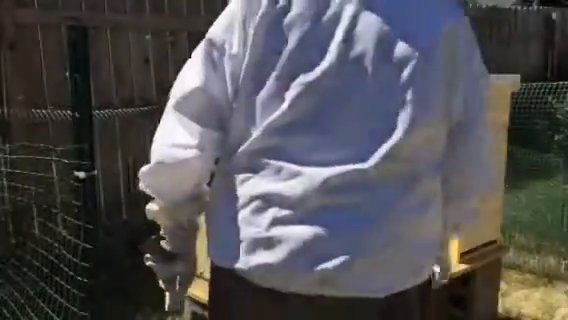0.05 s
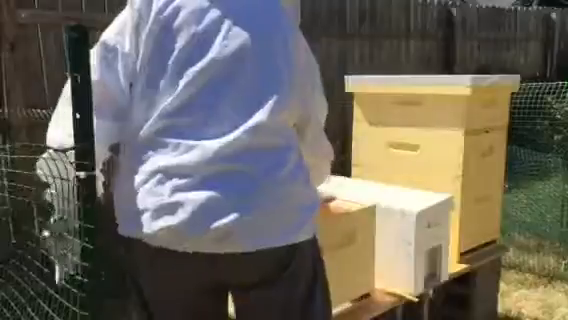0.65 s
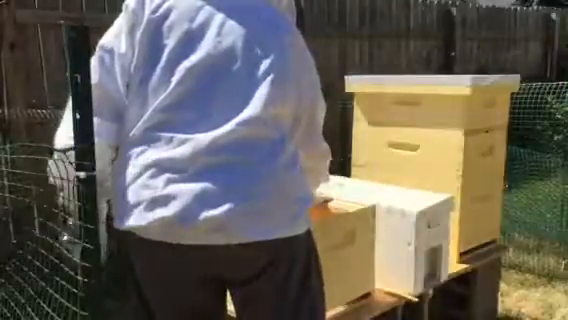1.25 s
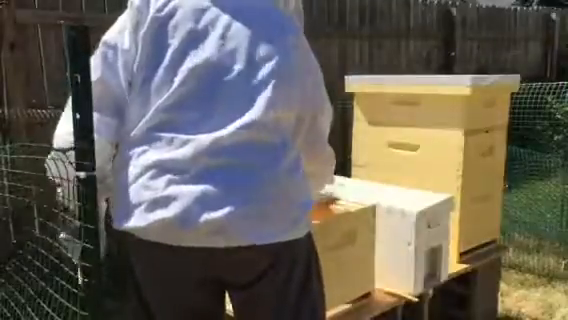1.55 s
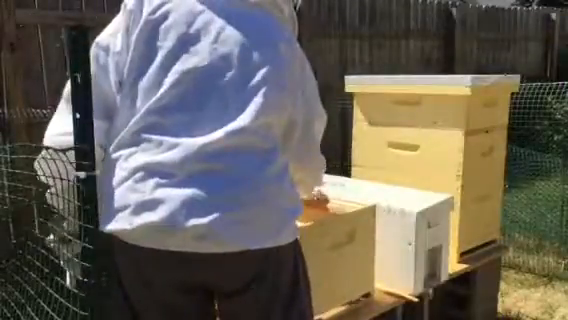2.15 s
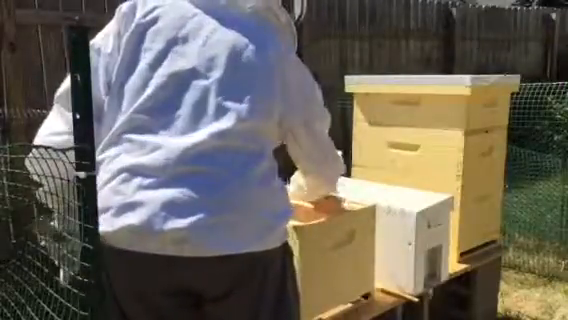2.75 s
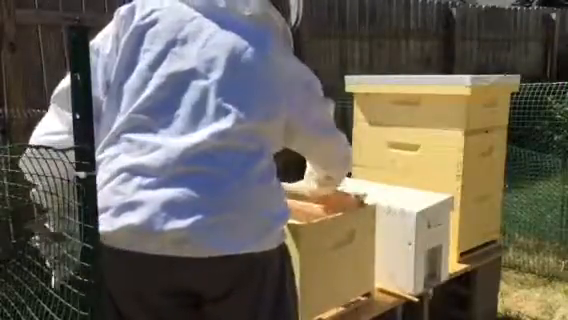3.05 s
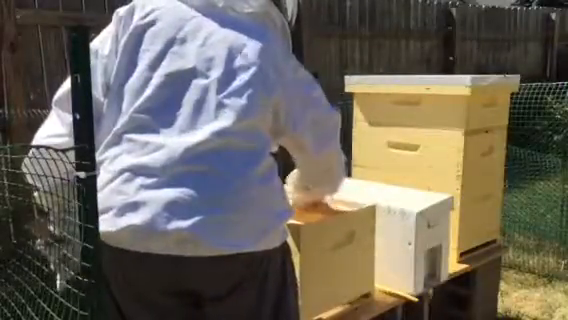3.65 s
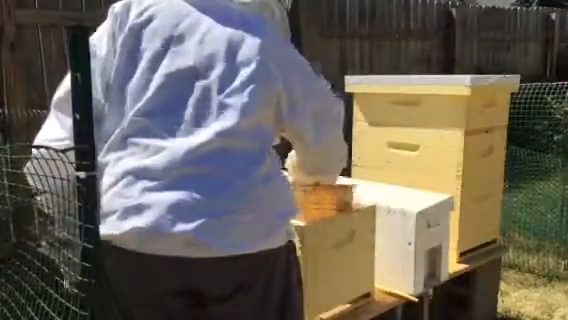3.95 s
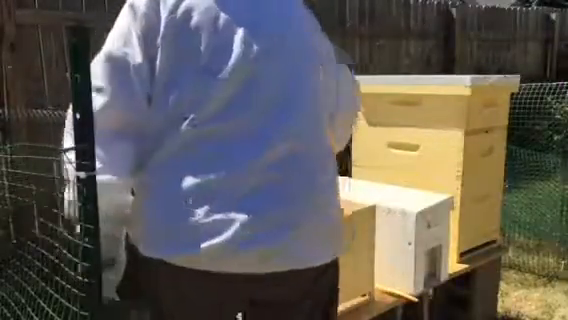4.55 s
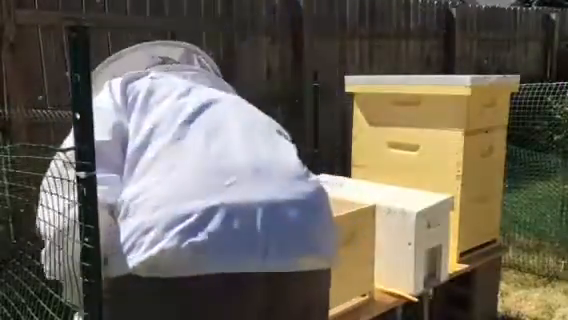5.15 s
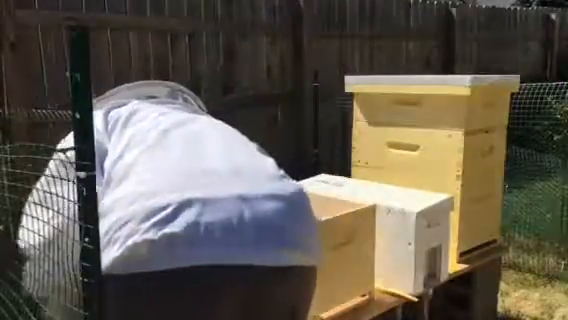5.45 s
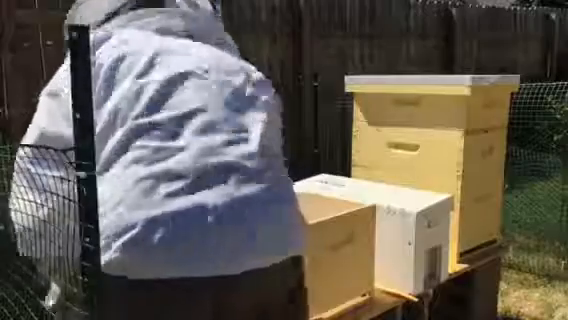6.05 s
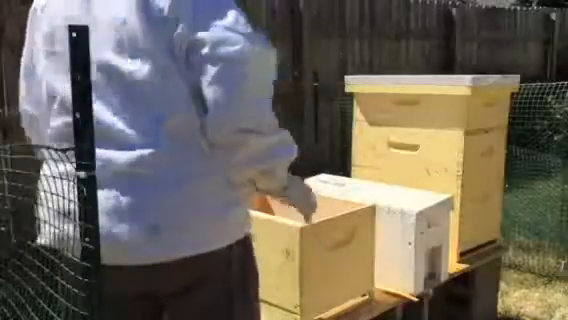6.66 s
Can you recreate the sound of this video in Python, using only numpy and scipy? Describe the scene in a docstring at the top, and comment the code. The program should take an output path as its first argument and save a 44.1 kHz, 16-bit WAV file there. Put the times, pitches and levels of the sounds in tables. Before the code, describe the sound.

Low wind thumps come and go on the microphone in a yard while someone handles a wooden beehive. A couple of soft taps lead to a sharp wooden knock, then a quick run of clatter, creaks and scraping as a frame comes loose. A second short wooden scrape follows later as the gusts die down. Light cloth rustling and a faint hum of bees lie underneath throughout.

```python
"""In a fenced yard, a beekeeper pries a wooden frame loose, drags it from a hive box and slides it
into another. Impacts excite the modes of frame and box; stick-slip friction makes the wood scrape
and creak, and fence and house return a short echo. Turbulent gusts buffet the microphone and the
cloth of the suit rustles. Beneath it all, the bees' wingbeats hum faintly in the outdoor air."""
import sys
import numpy as np
from scipy import signal
from scipy.fft import rfft, irfft
from scipy.io import wavfile
from scipy.ndimage import uniform_filter1d

SR = 44100
rng = np.random.default_rng(int(sys.argv[2]) if len(sys.argv) > 2 else 0)


def put_to_file(sound):
    """Save the sound as 16-bit audio at rate SR, in the file named by the first command-line argument."""
    columns = np.atleast_2d(sound).T  # one column per channel
    safe = np.clip(columns, -1, 1)
    whole_steps = np.round(safe * 32767)
    wavfile.write(sys.argv[1], SR, whole_steps.astype(np.int16))


N = 304731
TIME = np.arange(N) / SR

# Modes of the pried frame. Each row: frequency in Hz, relative level in dB, 60 dB decay time in seconds.
FRAME_MODES = [(234, -18, 0.15), (370, -18, 0.14), (580, -26, 0.055), (769, -13.5, 0.11), (880, -16, 0.058),
               (950, -0.5, 0.085), (1075, -14, 0.085), (1181, -10.5, 0.077), (1350, -6, 0.061),
               (1475, -16, 0.042), (1555, -8.5, 0.06), (1695, -5, 0.058), (1940, -18, 0.055),
               (2200, -18, 0.039), (2900, -40, .06)]
# Resonances of the open hive box. Each row: frequency in Hz, bandwidth in Hz, gain in dB.
HIVE_RESONANCES = [(233, 40, 4.5), (360, 87, 1), (534, 103, 6.5), (658, 29, -6.5), (802, 66, -1.5),
                   (923, 54, -15), (1174, 120, -6), (1357, 100, -5.5), (1532, 72, 1.5), (1666, 25, -0.5),
                   (1890, 180, -5), (2200, 110, -8), (2530, 29, -41), (2720, 60, -30), (3450, 110, -2),
                   (4220, 50, -49)]
# Spectrum of the surface crack. Each row: frequency in Hz, relative level in dB.
CRACK_SPECTRUM = [(1200, 10), (2500, 10.5), (3800, 7), (6000, 0), (8000, -6), (11000, -14), (15500, -19)]
# Impacts of wood on wood. Each row: start in seconds, body level in dB, contact cut-off in Hz,
# crack level in dB, the frame's share of the ringing from 0 to 1, chatter decay time in seconds.
KNOCKS = [ (1.540, -43, 1750, -88, 0.23, 0.013), (2.259, -45.5, 2650, -76, 0.23, 0.011),
          (2.309, -52.5, 5000, -51.5, 0.9, 0.01), (2.950, -37, 2520, -55, 0.6, 0.0033),
          (2.952, -23, 2200, -42, 0.95, 0.0025), (3.022, -52.5, 2200, -70, 0.25, 0.028),
          (3.236, -47.5, 1510, -70, 0.02, 0.015), (3.329, -42, 1700, -54, 0, 0.01),
          (3.414, -41, 2720, -52.5, 0.1, 0.007), (3.478, -33, 1080, -55, 0, 0.024),
          (3.522, -43, 1500, -48.5, 0, 0.0079), (3.545, -31.5, 1350, -48.5, 0.17, 0.0065),
          (3.563, -46, 4000, -50.5, 0.07, 0.003), (3.779, -38, 3500, -59, 0, 0.02),
          (3.815, -44, 3970, -49, 0.34, 0.0018), (3.823, -38.5, 2120, -54, 0.6, 0.0067),
          (3.832, -43, 4370, -59, 0, 0.0079), (3.901, -43, 700, -57.5, 0, 0.012),
          (4.136, -57.5, 2980, -63.5, 0, .011), (4.438, -53, 3970, -59, 0.07, 0.003),
          (4.628, -57.5, 1900, -67, 0.24, 0.0025), (4.894, -65, 4000, -63, 0.06, .007)]


def knocks(rise_s=0.0037, frame_chatter=0.04, crack_ring_s=0.0064):
    """Impact excitation: each contact chatters, rings frame and box, and cracks at the surface."""
    out, t = np.zeros(N), TIME[:SR // 4]
    slips = grains(spread_db=-0.5)
    splinters = colour(grains(spread_db=3.0), CRACK_SPECTRUM)
    attack = 1 - np.exp(-t / rise_s)
    for k, (start, body_db, contact_hz, crack_db, share, chatter_s) in enumerate(KNOCKS):
        span = slice(k * len(t), (k + 1) * len(t))
        chatter = slips[span] * attack * np.exp(-t / chatter_s)
        chatter /= np.linalg.norm(chatter)
        # The frame takes mostly the first clean blow, the box the whole chatter.
        blow = (t == 0) + frame_chatter * chatter
        frame = as_hit(attack * ring(blow, FRAME_MODES))
        box = as_hit(resonate(chatter, HIVE_RESONANCES))
        wood = np.sqrt(share) * frame + np.sqrt(1 - share) * box
        body = as_hit(cut(wood, contact_hz, "low", order=4))
        crack = as_hit(splinters[span] * attack * np.exp(-t / (chatter_s + crack_ring_s)))
        add(out, start, from_db(body_db) * body + from_db(crack_db) * crack)
    return out


# Resonances of the second box. Each row: frequency in Hz, bandwidth in Hz, gain in dB.
SECOND_BOX_RESONANCES = [(420, 27, -35), (463, 13, -3), (558.3, 7.6, 9), (616, 34, -7.5), (710, 55, -4),
                         (787, 27, -11), (870, 18, -10), (1100, 45, -8.5), (1300, 60, -14.5),
                         (1430, 36, -9.5), (1510, 28, -7.5), (1665, 22, -13), (2110, 50, -17),
                         (2350, 120, -14)]


def scrape(box, start_s, length_s, stop_s, db, build_db_per_s, judder_db, dull_hz, rasp_db):
    """Stick-slip friction drives a box's resonances; pressure builds until the frame stops."""
    grip_s, settle_db, settle_s = .016, -16.5, .19
    rasp_hz, pressure_dulls_db = 1300, 6
    end_s = start_s + length_s
    build_up = from_db(build_db_per_s * np.minimum(TIME - end_s, 0))
    push = swell(start_s, length_s, grip_s, stop_s) * build_up
    settling = from_db(settle_db) * swell(end_s, 0, grip_s, settle_s)
    pressure = np.hypot(push, settling)
    friction = grains(spread_db=2.5) * from_db(judder_db * drift(rate_hz=150))
    body = cut(resonate(friction, box), dull_hz, "low", order=6)
    body = steady(cut(body, hz=393, kind="high", order=3))
    # Pressure dulls the rasp of the upper resonances.
    rasp = irfft(rfft(body) * (np.fft.rfftfreq(N, 1 / SR) > rasp_hz), N)
    rasp_gain = from_db(rasp_db - pressure_dulls_db * pressure)
    return from_db(db) * pressure * (body + rasp * (rasp_gain - 1))


# Creaks of sticky wood letting go. Each row: centre time in seconds, level in dB, pitch in Hz,
# Gaussian width in seconds.
CREAKS = [(3.401, -56, 1630, .014), (3.421, -38, 1860, .005), (3.421, -43.5, 2520, .005),
          (3.567, -45, 2750, .003), (3.578, -50, 2740, .003), (3.818, -32, 2400, .0022),
          (3.825, -32.5, 1580, 0.0028), (3.843, -47.5, 2670, .008), (4.441, -46, 2400, .0018)]


def creaks(relative_bandwidth=0.077):
    """Fast, irregular stick-slip gives a burst of narrow-band noise around one pitch."""
    out, t = np.zeros(N), TIME[:SR // 8]
    hz = np.fft.rfftfreq(len(t), 1 / SR)
    for centre, db, pitch, width_s in CREAKS:
        band = np.exp(-.5 * ((hz / pitch - 1) / relative_bandwidth) ** 2)
        slips = irfft(rfft(rng.standard_normal(len(t))) * band, len(t))
        envelope = np.exp(-.5 * ((t - t.mean()) / width_s) ** 2)
        burst = slips * envelope
        burst *= np.linalg.norm(envelope) / np.linalg.norm(burst)
        add(out, centre - t.mean(), from_db(db) * burst)
    return out


# Spectra of the wind's rumble and of its fine whirls. Each row: frequency in Hz, relative level in dB.
RUMBLE_SPECTRUM = [(18, -28), (28, -15), (38, -4), (50, 1), (75, 2.5), (120, -3.5), (180, -12.5),
                   (260, -25.5), (400, -37.5), (800, -67.5)]
WHIRL_SPECTRUM = [(80, -22), (160, -0.5), (210, 4), (330, -7), (450, -17), (700, -53.5)]
# The ever-present breeze. Each row: time in seconds, relative level in dB.
BREEZE = [(0, -53), (.45, -50.5), (1.1, -52), (1.4, -48), (2.1, -44.5), (3.3, -45), (3.75, -49), (5.1, -49),
          (5.72, -53), (5.95, -48.5), (6.4, -50.5), (6.91, -48.5)]
# Gusts on top of it. Each row: start in seconds, length in seconds, relative level in dB.
GUSTS = [(.64, .1, -50), (.93, .07, -43), (1.1, .11, -44), (1.5, .2, -45), (2.2, .4, -33), (2.66, .2, -39),
         (3.0, .26, -38), (3.37, .14, -32), (3.575, .06, -27.5), (3.8, .09, -31), (3.96, .23, -35),
         (4.27, .12, -36.5), (4.48, .13, -36), (4.69, .31, -42), (5.07, .08, -35), (5.33, .04, -42),
         (5.47, .02, -42)]
# The strongest eddies. Each row: centre time in seconds, level in dB before the bass cut, swing in Hz.
EDDIES = [(1.114, -23.5, 95), (1.211, -33, 99), (2.216, -28, 90), (2.340, -18, 106), (2.451, -20, 110),
          (2.476, -24, 112), (2.528, -20.5, 87), (2.581, -20, 86), (2.632, -23, 117), (2.701, -24.5, 75),
          (3.068, -24.5, 99), (3.131, -23, 83), (3.176, -27, 110), (3.406, -22.5, 117), (3.459, -21, 82),
          (3.502, -19, 195), (3.588, -15, 140), (3.865, -22.5, 123), (3.912, -23.5, 153),
          (4.002, -21.5, 119), (4.169, -18.5, 96), (4.713, -29, 84), (4.817, -22.5, 81), (4.925, -24.5, 81),
          (5.009, -23, 121)]


def wind(rumble_db=-2.0, lump_db=2.5, eddy_cycles=0.51, whirl_db=-13.5, port_hz=38):
    """Turbulence shakes the pressure at the microphone port; single eddies swing it one way and back."""
    rumble = steady(colour(rng.standard_normal(N), RUMBLE_SPECTRUM))
    rumble *= from_db(lump_db * drift(rate_hz=24))
    breeze = from_db(np.interp(TIME, *np.transpose(BREEZE)))
    flow = np.hypot(breeze, swells(GUSTS, attack_s=.014, release_s=.022))
    pressure = from_db(rumble_db) * flow * rumble
    t = TIME[:SR // 12]
    for (centre, db, hz), phase in zip(EDDIES, rng.uniform(0, 2 * np.pi, len(EDDIES))):
        cycles = (t - t.mean()) * hz
        swing = np.cos(2 * np.pi * cycles + phase) / np.cosh(2 * cycles / eddy_cycles)
        add(pressure, centre - t.mean(), from_db(db) * swing)
    # Strong swings break up into finer, faster whirls.
    force = np.sqrt(uniform_filter1d(pressure ** 2, size=SR // 60) + 1e-14)
    whirls = force * (force / force.max()) ** 0.45 * colour(rng.standard_normal(N), WHIRL_SPECTRUM)
    # The microphone passes no deep bass.
    return cut(pressure + from_db(whirl_db) * whirls, port_hz, "high", order=5)


# Spectra of the suit's thin swish and deeper rustle. Each row: frequency in Hz, relative level in dB.
SWISH_SPECTRUM = [(2000, -11), (4500, -1), (7000, -5.5), (9000, 4.5), (10400, -0.5), (12000, 4), (15500, 1)]
RUSTLE_SPECTRUM = [(500, -18), (1500, 5.5), (3000, 3), (4500, -5.5), (6300, -2), (8000, -21), (15000, -31)]
# Body movements. Each row: start in seconds, length in seconds, relative swish and rustle levels in dB.
RUBS = [(.03, .14, -66, -72), (.3, .6, -79, -73), (.65, .015, -68, -70), (.71, .02, -78, -66),
        (1.0, 1.2, -84, -73.5), (1.42, .06, -81, -66), (2.33, .15, -88, -70), (2.93, .14, -78, -67),
        (4.22, .04, -79, -66), (4.33, 1.22, -75, -81), (4.425, .035, -64, -63), (4.5, .3, -73, -85),
        (4.88, .07, -70, -70), (5.27, .16, -79, -66), (5.74, .04, -79, -66), (6.3, .42, -80, -88),
        (6.78, .13, -70, -69)]


def suit(rest_swish_db=-83, rest_rustle_db=-81, rustle_trim_db=-1, flutter_db=2.0):
    """Friction of cloth on cloth sounds in tiny slips that swell with each move and never quite stop."""
    start, length, swish_db, rustle_db = np.transpose(RUBS)

    def rubbing(move_db, rest_db, spectrum, spread_db):
        moves = swells(zip(start, length, move_db), attack_s=.025, release_s=.028)
        return np.hypot(from_db(rest_db), moves) * colour(grains(spread_db), spectrum)

    swish = rubbing(swish_db, rest_swish_db, SWISH_SPECTRUM, spread_db=3.5)
    rustle = rubbing(rustle_db, rest_rustle_db, RUSTLE_SPECTRUM, spread_db=5.0)
    return (swish + from_db(rustle_trim_db) * rustle) * from_db(flutter_db * drift(rate_hz=52))


# Dry ticks of cloth and straw. Each row: start in seconds, relative level in dB.
TICKS = [(0.0857, -34), (0.3636, -50), (2.204, -43), (4.776, -50)]


def ticks(gain_db=-8, decay_s=0.0025):
    """A snapping fold or straw radiates a transient of bright, fast-decaying noise."""
    out, t = np.zeros(N), TIME[:SR // 30]
    for start, db in TICKS:
        add(out, start, from_db(db + gain_db) * rng.standard_normal(len(t)) * np.exp(-t / decay_s))
    return cut(out, hz=8640, kind="high")


def bees(count=8, wingbeat_hz=236, pitch_spread=.05, dull_hz=500, db=-65):
    """Periodic wingbeats superpose into a distant hum, each wandering in pitch and level."""
    hum = 0
    for offset in rng.standard_normal(count):
        pitch = wingbeat_hz * np.exp(pitch_spread * (offset + .5 * drift(rate_hz=3.5)))
        wingbeat = signal.sawtooth(2 * np.pi * np.cumsum(pitch) / SR)
        hum += wingbeat * from_db(4.9 * drift(rate_hz=2.08))
    return from_db(db) * rms_one(cut(hum, dull_hz, "low"))


# Spectrum of the outdoor air. Each row: frequency in Hz, relative level in dB.
AIR_SPECTRUM = [(60, -21.5), (150, -3.5), (300, -8), (500, -10.5), (750, -15.5), (1100, -13.3), (1600, -20),
                (2500, -24), (4000, -27.5), (7000, -31.3), (10000, -36), (15500, -41)]


def air(db=-60.2, waver_db=4.0, waver_below_hz=2000):
    """Distant ambient noise, whose lower bands are each amplitude-modulated at random."""
    spectrum = rfft(colour(rng.standard_normal(N), AIR_SPECTRUM))
    hz = np.fft.rfftfreq(N, 1 / SR)
    edges = np.linspace(0, waver_below_hz, num=17)
    out = irfft(spectrum * (hz >= waver_below_hz), N)
    for low, high in zip(edges, edges[1:]):
        band = irfft(spectrum * ((hz >= low) & (hz < high)), N)
        out += band * from_db(waver_db * drift(rate_hz=14))
    return from_db(db) * rms_one(out)


def yard(x, wet_db=-24, t60=0.31, dull_hz=5000, first_echo_s=0.022):
    """Scattering from fence and house adds a short, dull reverberant tail."""
    t = TIME[:SR * 3 // 4]
    scatter = cut(rng.standard_normal(len(t)), dull_hz, "low", order=1)
    echoes = scatter * from_db(-60 * t / t60) * (t > first_echo_s)
    return x + from_db(wet_db) * signal.fftconvolve(x, echoes / np.linalg.norm(echoes))[:N]


def ring(x, modes):
    """Modal superposition: damped sinusoids of alternating sign, driven by x."""
    out = 0
    for k, (hz, db, t60) in enumerate(modes):
        r, w = from_db(-60 / (t60 * SR)), 2 * np.pi * hz / SR
        out += (-1) ** k * signal.lfilter([0, from_db(db) * np.sin(w)], [1, -2 * r * np.cos(w), r * r], x)
    return out


def resonate(x, peaks):
    """Forced response of parallel band-pass resonators."""
    out = 0
    for hz, width, db in peaks:
        r, w = np.exp(-np.pi * width / SR), 2 * np.pi * hz / SR
        gain = from_db(db) * (1 - r * r) / 2
        out += gain * signal.lfilter([1, 0, -1], [1, -2 * r * np.cos(w), r * r], x)
    return out


def colour(x, spectrum):
    """Spectral shaping by (Hz, dB) rows; rms 1."""
    hz, db = np.transpose(spectrum)
    bins = np.maximum(np.fft.rfftfreq(len(x), 1 / SR), 1)
    gain = from_db(np.interp(np.log(bins), np.log(hz), db))
    return rms_one(irfft(rfft(x) * gain, len(x)))


def cut(x, hz, kind, order=2):
    """Butterworth low- or high-pass."""
    return signal.sosfilt(signal.butter(order, hz, kind, fs=SR, output="sos"), x)


def drift(rate_hz):
    """Random modulation: straight lines between Gaussian values of spread 1."""
    return np.interp(TIME * rate_hz, np.arange(4000), rng.standard_normal(4000))


def grains(spread_db):
    """Friction noise: dense tiny slips of uneven size."""
    return rng.standard_normal(N) * from_db(spread_db * np.minimum(rng.exponential(1, N), 5))


def swell(start, length, attack_s, release_s):
    """Exponential attack, hold at 1 and exponential release."""
    early, late = np.maximum(start - TIME, 0), np.maximum(TIME - start - length, 0)
    return np.exp(-np.minimum(early / attack_s + late / release_s, 20))


def swells(rows, attack_s, release_s):
    """Incoherent summation: (start, length, dB) swells add in power."""
    gains = (from_db(db) * swell(start, length, attack_s, release_s) for start, length, db in rows)
    return np.sqrt(sum(gain ** 2 for gain in gains))


def steady(x):
    """Division by the running rms evens out a noise; rms 1."""
    return rms_one(x / np.sqrt(uniform_filter1d(x ** 2, size=SR // 14) + 1e-14))


def as_hit(x):
    """Scale a hit to the energy of 25 ms at rms 1."""
    return x / np.sqrt(np.sum(x ** 2) / (.025 * SR) + 1e-20)


def rms_one(x):
    """Scale to unit rms."""
    return x / np.sqrt(np.mean(x ** 2) + 1e-20)


def from_db(db):
    """Decibels to amplitude gain."""
    return 10 ** (np.asarray(db) / 20)


def add(track, start_s, sound):
    """Mix a short sound in at start_s."""
    start = max(round(start_s * SR), 0)
    track[start:start + len(sound)] += sound[:N - start]


def scene():
    """Superposition of the woodwork and its echo with wind, suit, bees and air, in one channel."""
    drag_out = scrape(HIVE_RESONANCES, start_s=3.398, length_s=.162, stop_s=.015, db=-34.5,
                      build_db_per_s=22, judder_db=-1.0, dull_hz=1680, rasp_db=.5)
    slide_in = scrape(SECOND_BOX_RESONANCES, start_s=5.226, length_s=.084, stop_s=.054, db=-32.5,
                      build_db_per_s=115, judder_db=1.0, dull_hz=1720, rasp_db=3)
    woodwork = knocks() + creaks() + drag_out + slide_in
    return (yard(woodwork) + suit() + ticks() + bees() + air() + wind())[None]


def record(dry, cutoff_hz=15800):
    """Band limiting: an elliptic low-pass cuts the highest treble steeply."""
    return signal.sosfilt(signal.ellip(12, .1, 80, cutoff_hz, fs=SR, output="sos"), dry)


dry = scene()
out = record(dry)
put_to_file(out)
```